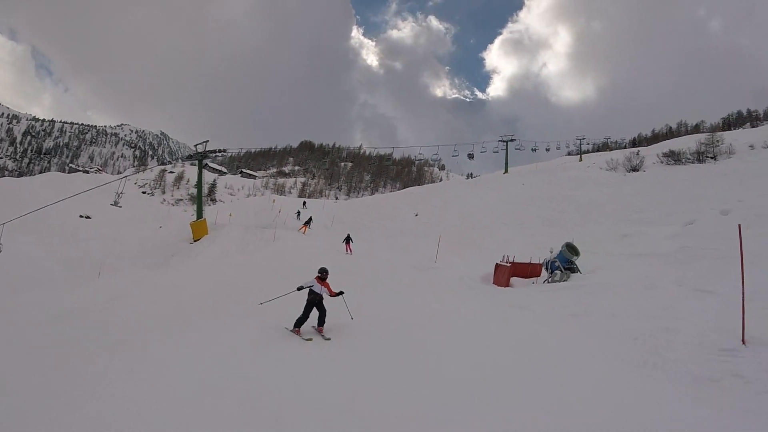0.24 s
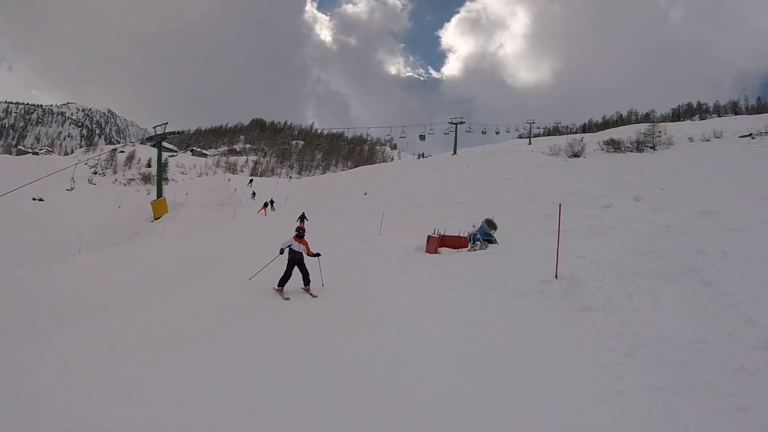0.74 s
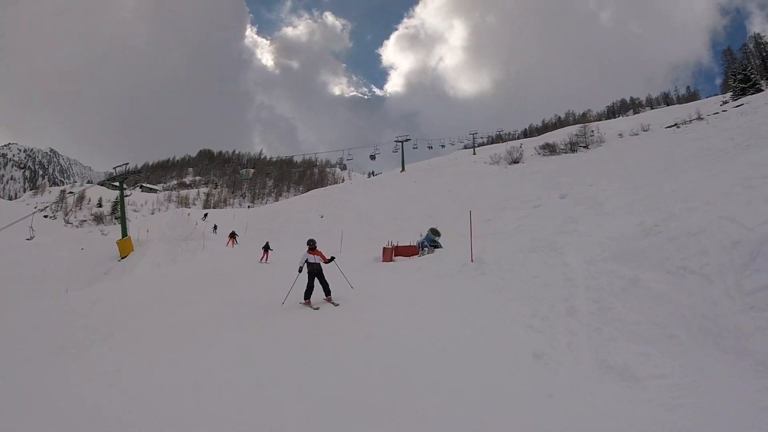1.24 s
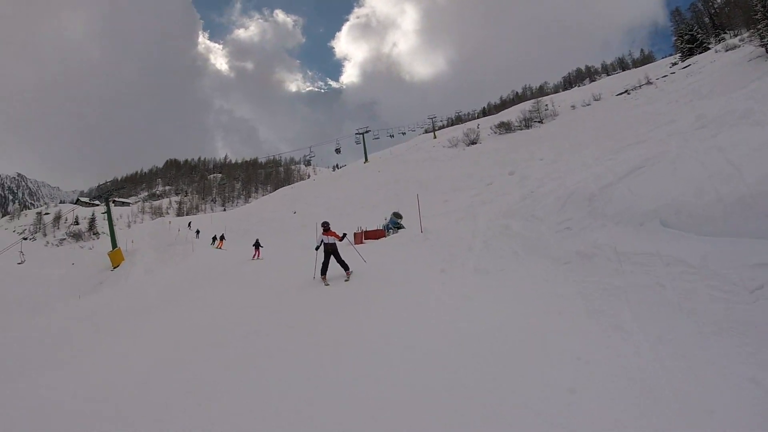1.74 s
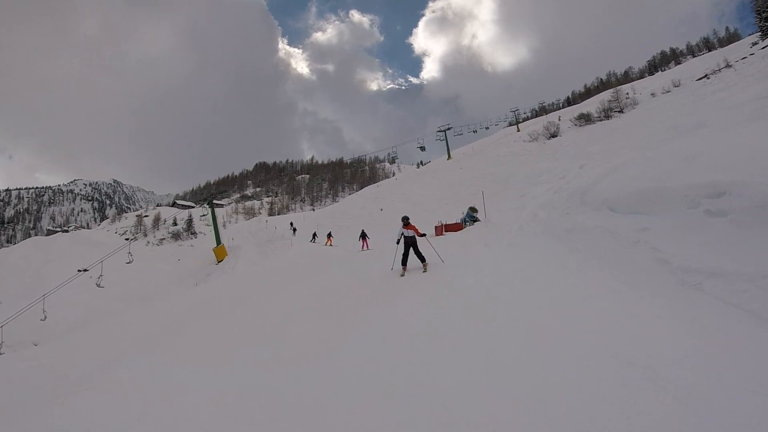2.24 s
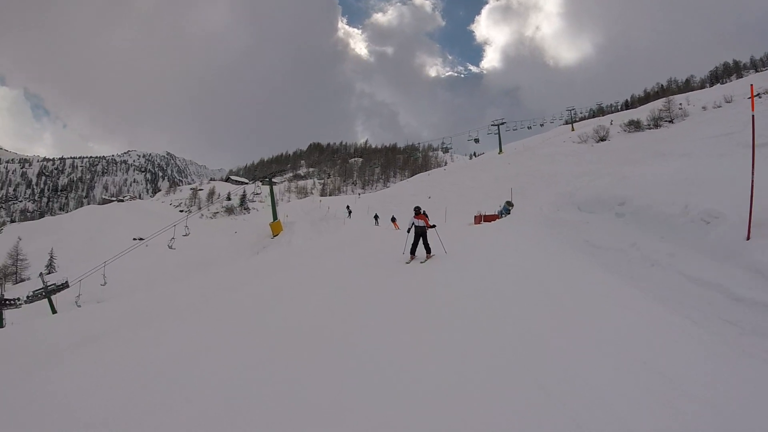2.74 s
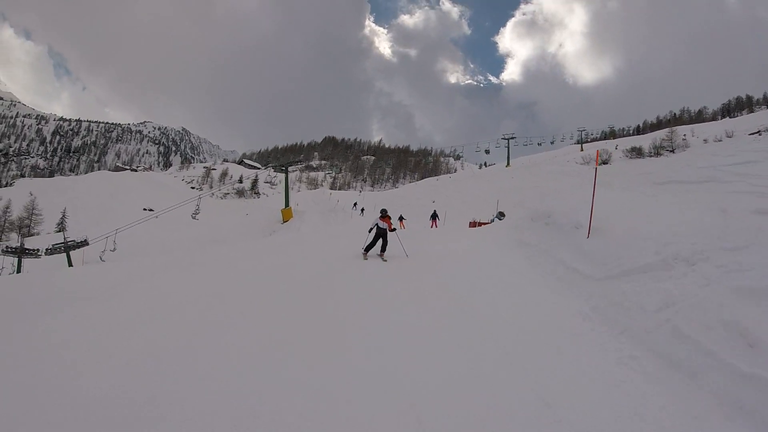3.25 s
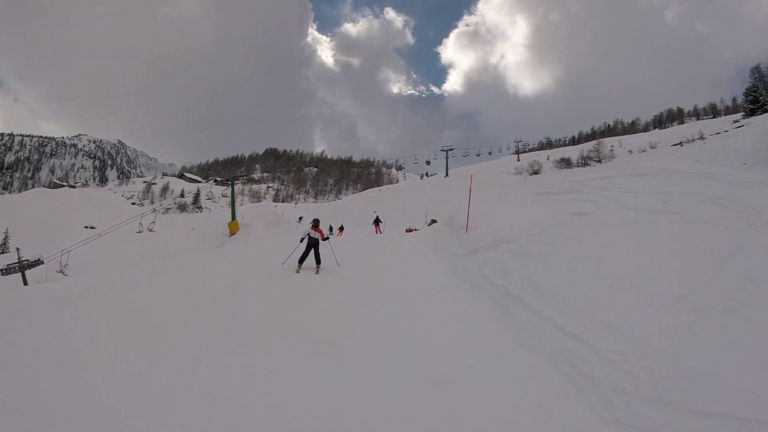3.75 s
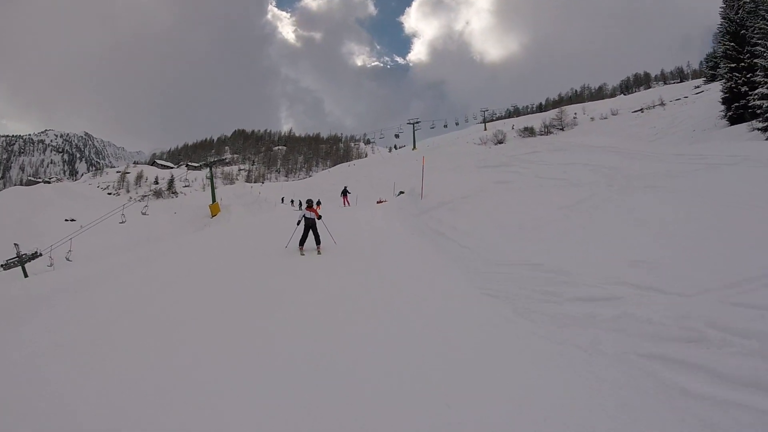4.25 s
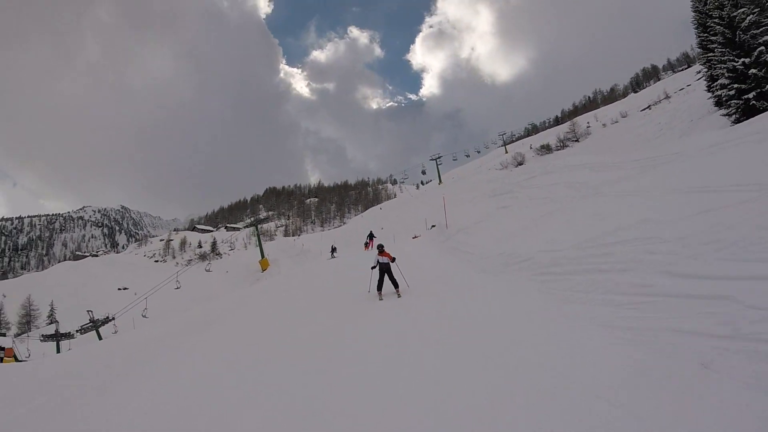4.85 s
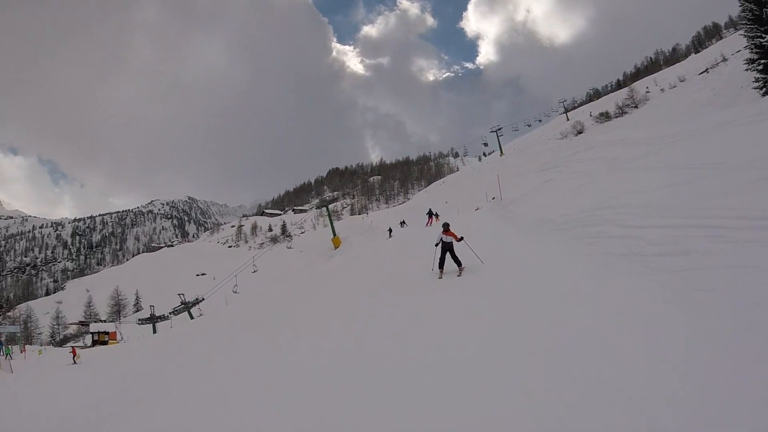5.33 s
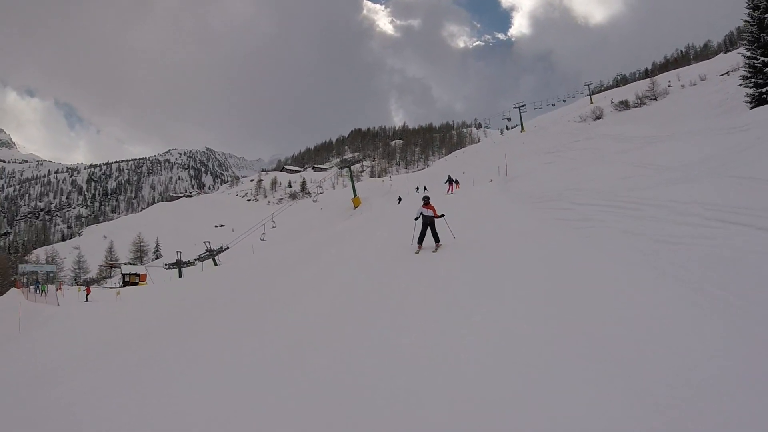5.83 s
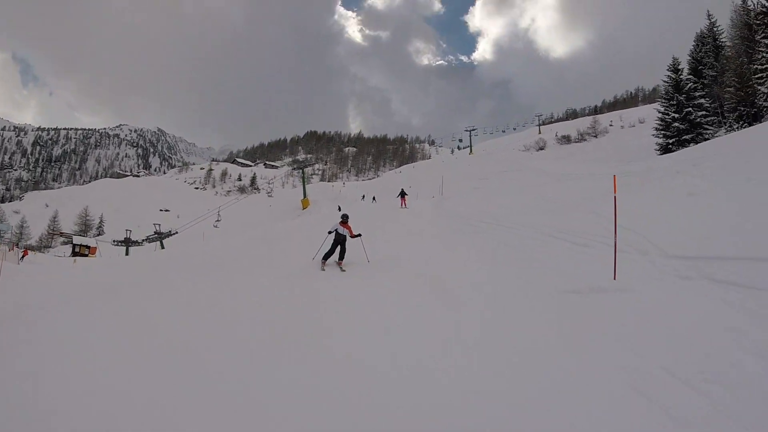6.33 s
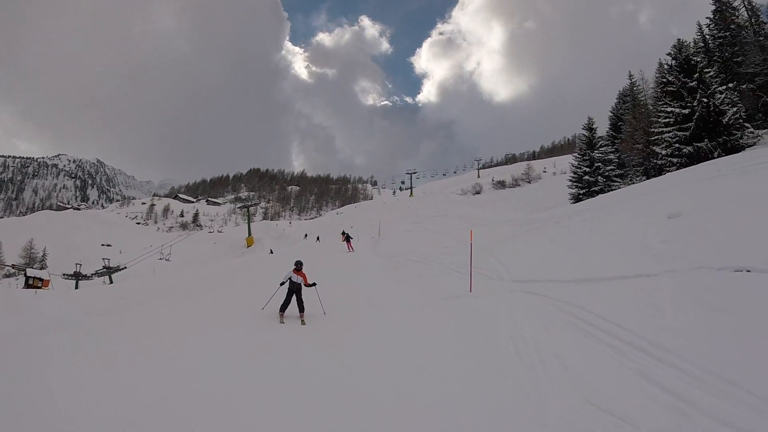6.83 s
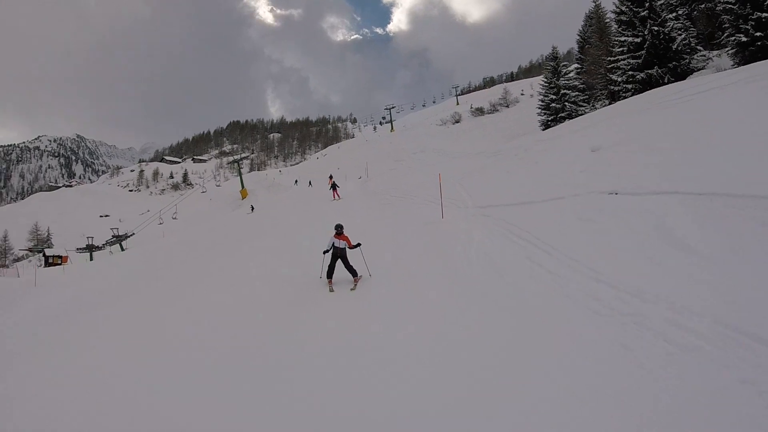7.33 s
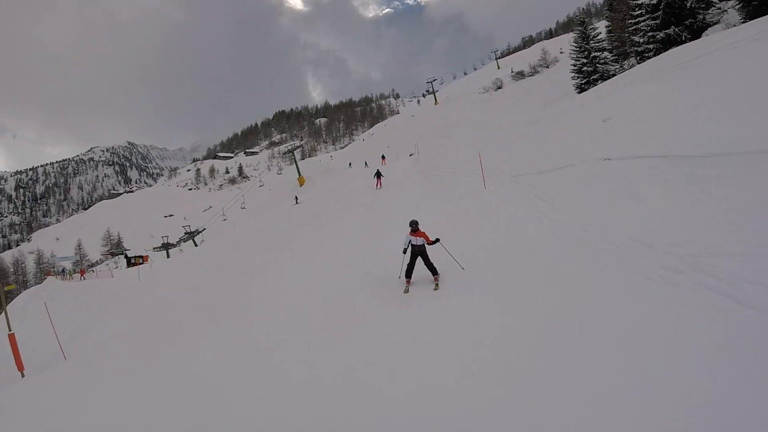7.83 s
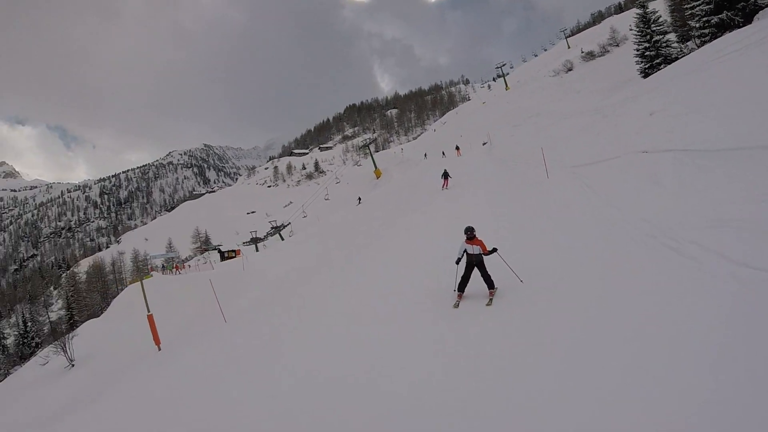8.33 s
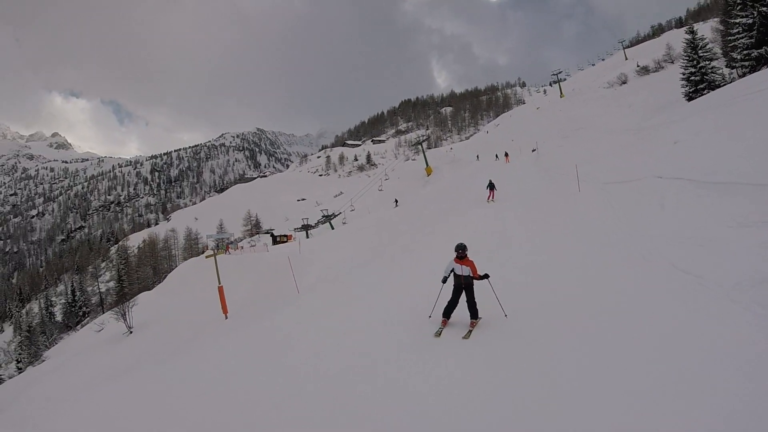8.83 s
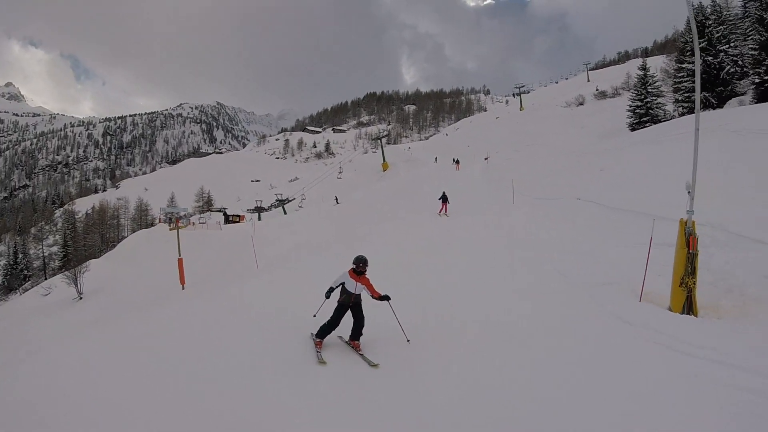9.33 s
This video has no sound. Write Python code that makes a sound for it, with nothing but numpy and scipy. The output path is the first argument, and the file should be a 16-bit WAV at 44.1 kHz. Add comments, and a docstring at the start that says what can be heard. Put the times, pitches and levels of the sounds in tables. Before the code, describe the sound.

Low wind thumps and flutters over a small microphone while ski edges scrape and crunch through turns, ending with skis clacking together.

```python
"""Wind thumps and flutters over a small camera that a skier carries down a groomed slope in linked turns.
Large eddies push on the microphone, smaller ones flutter in clumps, and some gusts roar or bring a hard puff.
In the turns the edges scrape, chatter and groan, as noise shaped by the snow and the ringing of the skis.
Loose snow hisses, hard lumps tick, and the skis clack together near the end."""
import sys
import numpy as np
from scipy import signal
from scipy.fft import rfft, irfft, next_fast_len
from scipy.io import wavfile
from scipy.ndimage import uniform_filter1d, minimum_filter1d, map_coordinates

SR = 44100
rng = np.random.default_rng(int(sys.argv[2]) if len(sys.argv) > 2 else 0)


def int16_out(signal):
    """Quantize to a 16-bit WAV file."""
    q = np.round(np.clip(np.atleast_2d(signal).T, -1, 1) * 32767)
    wavfile.write(sys.argv[1], SR, q.astype(np.int16))


N = 422478
TIME = np.arange(N) / SR

# colours of large, medium and small eddies: (frequency [Hz], level per Hz [dB])
LARGE_EDDIES = [(8, -6), (22, 0), (45, 2), (75, -2.5), (105, -4.5), (140, -16), (200, -29), (330, -51.5),
                (3000, -120)]
MEDIUM_EDDIES = [(50, -19), (85, -9), (120, 1), (165, -3.5), (210, -7), (260, -16.5), (350, -31),
                 (600, -49), (3000, -110)]
SMALL_EDDIES = [(120, -25.5), (200, -2.5), (255, 1), (340, -4.5), (450, -11), (700, -19.5), (1200, -30),
                (3000, -57), (12000, -96)]
# gusts and lulls: (middle time [s], half length [s], change of large eddies [dB], change of small eddies [dB])
GUSTS = [(0.182, 0.022, -6, -4), (0.33, 0.03, -4, -2), (0.422, 0.031, 7, 0), (0.515, 0.032, -4, -1),
         (1.055, 0.086, -1.5, -1), (1.196, 0.068, 4.5, 6), (1.65, 0.069, 2.5, -1), (1.926, 0.089, 1, 4),
         (2.251, 0.039, -10, -5), (2.333, 0.04, 5.5, 4), (2.848, 0.13, -1, 5), (3.13, 0.056, -2.5, -1),
         (3.689, 0.03, -5, -1), (4.36, 0.12, -1.5, 2), (5.098, 0.33, 2, -1), (5.496, 0.059, 1.5, 4),
         (5.973, 0.08, 0.5, 3), (6.158, 0.066, 2, 3), (6.299, 0.053, 0.5, -3.5), (6.808, 0.14, 1.5, -1.5),
         (7.7, 0.2, 2, 1.5), (8.473, 0.11, -3, 0), (8.741, 0.1, -5.5, 1), (8.935, 0.097, 8, 1.5),
         (9.452, 0.036, -3, -1.5)]
# growth with the airflow: (level when cruising [dB], dB per dB of airflow, airflow where it levels off [dB])
LARGE_LAW, MEDIUM_LAW, SMALL_LAW = (-7, 0.89, -8.5), (-14, 1.486, -4.5), (-29, 0.97, 11.9)
# how the eddies' pitch follows the airflow and the gusts [dB per dB]
SPEED_DB_PER_DB, GUST_PITCH_DB_PER_DB = 0.14, -0.0145


def wind():
    """Large eddies push on the microphone; smaller ones gather in clumps where that push is strong."""
    air_db = airflow()
    large_db = eddy_level(air_db, LARGE_LAW)
    medium_db = eddy_level(air_db, MEDIUM_LAW)
    calm_small_db = eddy_level(air_db, SMALL_LAW)
    gust_db = np.zeros(N)  # change of the small eddies
    for s, half_s, large_change_db, small_change_db in GUSTS:
        gust = swell(s, half_s, half_s)
        large_db = large_db + large_change_db * gust
        medium_db = medium_db + 0.36 * (large_change_db + small_change_db) * gust
        gust_db = gust_db + small_change_db * gust
    small_db = calm_small_db + gust_db
    speed = undb(SPEED_DB_PER_DB * air_db + GUST_PITCH_DB_PER_DB * gust_db + .4 * walk(rate=12))

    large = steady(eddies(LARGE_EDDIES, speed), (15, 130), span_s=.08)
    # the smaller eddies come in shared clumps
    clump_db = 1.23 * np.abs(large) + 1.0 * walk(rate=28)
    medium = steady(eddies(MEDIUM_EDDIES, speed) * undb(.7 * clump_db), (110, 220), span_s=.11)
    small = steady(eddies(SMALL_EDDIES, speed) * undb(1.4 * clump_db), (240, 450), span_s=.1)

    lurch_db = 1.52 * walk(rate=22)  # uneven strength shared by all sizes
    thumps = large * undb(large_db + 1.36 * lurch_db)
    rumble = medium * undb(medium_db + lurch_db)
    flutter = small * undb(small_db + 1.2 * lurch_db)
    return thumps + rumble + flutter


# airflow at the microphone, following the skier's speed: (time [s], level compared with cruising [dB])
AIRFLOW = [(0, -9), (0.13, -7), (0.31, -17.5), (0.76, -5.5), (1.05, -7.5), (1.62, -6), (2.0, -1.5),
           (2.7, -1.5), (3.12, -6), (3.55, -6.5), (3.85, 0), (4.4, 2), (4.9, -1.5), (5.55, 1), (6.15, 0),
           (6.45, -2.5), (7.2, -2.5), (7.5, -4.5), (8.2, -6.5), (8.72, -14.5), (9.2, -21), (9.58, -18)]


def airflow():
    """Strength of the airflow in dB, one value a sample."""
    return np.interp(TIME, *np.transpose(AIRFLOW))


def eddy_level(air_db, law):
    """Level in dB that grows with the airflow and then levels off."""
    db, slope, limit_db = law
    knee_db = 1.7  # softness of the levelling off
    excess_db = knee_db * np.logaddexp(0, (air_db - limit_db) / knee_db)
    return db + slope * (air_db - excess_db)


def eddies(spectrum, speed):
    """Roughness of air or snow carried past at a relative speed: going faster moves its whole spectrum up."""
    field = colour(rng.standard_normal(2 * N), spectrum)
    position = np.cumsum(speed) + SR // 10
    return map_coordinates(field, [position], order=3, mode="mirror")


# hollow roar of air around the camera: (frequency [Hz], level per Hz [dB])
ROAR_COLOUR = [(150, -32.5), (280, -9), (335, 6), (400, -3.5), (470, -7), (700, -27), (2000, -55),
               (6000, -91)]
# gusts that roar: (middle time [s], half length [s], level [dB], relative pitch)
ROARING_GUSTS = [(4.4, .13, -36, 1.03), (6.04, .17, -31, .88), (6.18, .055, -25.5, .96)]


def howl():
    """Some gusts make a hollow roar around the camera."""
    return surges(ROARING_GUSTS, ROAR_COLOUR, (280, 480), bend_db=0.5, wander_db=0.1)


# thud of a puff: (frequency at relative pitch 1 [Hz], level per Hz [dB])
THUD = [(120, -8), (340, 5), (500, 0), (700, -9), (1000, -18), (2000, -32), (10000, -79)]
# single hard puffs of air: (start time [s], relative level [dB], relative pitch)
PUFFS = [(1.687, -21.5, 1.05), (2.733, -19.5, 1.15), (2.846, -17.5, 1), (2.97, -19, 1.1), (6.201, -12, 1.1)]


def puffs():
    """A tight eddy hits the microphone and dies at once; each has its own pitch."""
    out = 0
    for s, db, pitch in PUFFS:
        thud = np.array(THUD) * [pitch, 1]
        out = out + colour(undb(db) * burst(s, t60=.06), thud)
    return undb(-3) * out


# colours of edge scrape, hard bite and snow spray: (frequency [Hz], level per Hz [dB])
SCRAPE = [(120, -13.5), (270, -4), (370, 6.5), (500, 1.5), (620, 2), (740, 1.5), (860, 2), (1250, -4),
          (1600, -5.5), (1950, -8.5), (2350, -16), (3100, -24.5), (4200, -28), (15000, -69.5)]
BITE = [(1200, -11.5), (2100, 6), (2500, 4), (3000, 3), (3500, -0.5), (4200, -7.5), (4800, -7), (5400, -6),
        (7000, -17.5), (9500, -28.5), (15000, -45.5)]
SPRAY = [(2500, -18.5), (4000, -9.5), (4800, -9.5), (5300, 1), (6200, -1), (7300, -3.5), (8400, -11),
         (9600, -22.5), (11000, -30.5), (13000, -28), (15000, -33.5)]


def skis(scrape_db, bite_db, spray_db):
    """Edges crush the crust in quick uneven slips, bite into hard snow and throw up a spray of crystals."""
    chatter_db = 0.5 * walk(rate=40) + 0.97 * walk(rate=210)
    crush = grains(rate=1400, spread_db=3.5) + 1.0 * rng.standard_normal(N)
    chips = grains(rate=900, spread_db=-0.5) + 1.12 * rng.standard_normal(N)
    crystals = grains(rate=2300, spread_db=3.0) + 1.0 * rng.standard_normal(N)

    scrape = colour(crush * undb(chatter_db), SCRAPE)
    scrape = steady(scrape + undb(-4) * ski_ring(scrape), (800, 2200), span_s=.15)
    bite = steady(colour(chips * undb(1.3 * chatter_db), BITE), (2600, 4600), span_s=.15)
    spray = steady(colour(crystals * undb(0.64 * chatter_db), SPRAY), (5200, 8000), span_s=.15)

    smooth_share = np.sqrt(1 - coarseness())  # grit() makes the rest of the scrape
    return scrape * undb(scrape_db) * smooth_share + bite * undb(bite_db - 0.9) + spray * undb(spray_db - 2.0)


# turns, in which the edges load and unload:
# (apex time [s], build-up [s], easing [s], relative scrape level [dB], spray compared with scrape [dB])
TURNS = [(0.1, .1, 0.29, -49.5, -7), (0.74, 0.24, 0.25, -39, -14.5), (2.07, 0.48, 0.25, -33.5, -16),
         (2.8, 0.86, 0.65, -41.5, -15), (3.8, 0.18, 0.32, -46.5, -11.5), (5.12, 0.49, 0.42, -33.5, -20.5),
         (6.64, 0.16, 0.28, -38.5, -14.5), (8.05, 0.54, 0.59, -37, -18), (8.55, 0.22, 0.24, -38, -17),
         (9.399, 0.24, 0.55, -48.5, -8.5)]
# skids, in which an edge breaks loose: (start time [s], length [s], relative scrape level [dB],
# bite compared with scrape [dB], spray compared with scrape [dB]), before the mix in skis()
SKIDS = [(0.0, 0.087, -38.5, -15, -15), (0.084, 0.072, -33.5, -13.5, -17), (0.558, 0.068, -46, -5, -23),
         (0.64, 0.081, -36, -10.5, -27), (1.094, 0.24, -48.5, -8, -15), (2.106, 0.077, -34.5, -17, -18),
         (2.32, 0.18, -41, -12, -10), (2.755, 0.11, -39.5, -10, -19), (3.696, 0.077, -41, -12.5, -16),
         (4.775, 0.077, -39.5, -8.5, -12), (5.025, 0.061, -34, -18, -21), (5.197, 0.11, -36.5, -18, -25),
         (5.465, 0.16, -39.5, -11.5, -20), (5.67, 0.28, -42.5, -16.5, -17.5),
         (6.529, 0.18, -37.5, -10.5, -19), (7.539, 0.071, -40.5, -16, -23), (7.868, 0.053, -37.5, -24, -17),
         (8.114, 0.087, -37.5, -9, -18)]


def edge_work():
    """Levels in dB of scrape, bite and spray: gliding, turns and skids add their power."""
    def share(shape, db, bite_db, spray_db):
        """Power of the three sounds as one movement of the skis comes and goes."""
        return np.outer(undb([db, db + bite_db, db + spray_db]) ** 2, shape ** 2)

    # flat skis running straight; their scrape follows the airflow
    power = share(np.ones(N), db=-45, bite_db=-13, spray_db=-17.5)
    power[0] *= undb(0.2 * airflow()) ** 2
    for apex, rise, fall, db, spray_db in TURNS:
        power = power + share(swell(apex, rise, fall), db, -16.5, spray_db)
    attack_s, release_s = .03, .028
    for start, length, db, bite_db, spray_db in SKIDS:
        onset = np.clip((TIME - start) / attack_s, 0, 1)
        fade = np.exp(-np.clip((TIME - start - length) / release_s, 0, 20))
        power = power + share(onset * fade, db, bite_db, spray_db)
    scrape_db, bite_db, spray_db = 10 * np.log10(power)
    patch_db = 0.59 * walk(rate=24)  # hard and soft patches of snow
    return scrape_db + patch_db, bite_db + .8 * patch_db + 1.1 * walk(rate=30), spray_db + 0.61 * patch_db


# ski modes, the notes a ski rings at: (frequency [Hz], relative level [dB], free ringing time to -60 dB [s])
SKI_MODES = [(574, -6, 0.034), (723, -1.5, 0.046), (1027, -11, 0.068), (1268, 2.5, 0.012),
             (1552, 1.5, 0.033), (1870, -1.5, 0.013), (2070, -10.5, 0.0031), (3050, -9.5, 0.034),
             (5227, -12, .05)]


def ski_ring(drive):
    """The ski's modes, each swelling and fading as the contact point slides along the edge."""
    out = 0
    for hz, db, t60 in SKI_MODES:
        width_hz = 2 * np.log(1000) / (np.pi * t60)  # snow contact doubles the damping
        mode = signal.lfilter(*signal.iirpeak(hz, hz / width_hz, fs=SR), drive)
        out = out + mode * undb(db + 3.9 * walk(rate=13))
    return out


# stretches of coarse, refrozen snow: (middle time [s], half length [s], level compared with scrape [dB])
COARSE = [(0.68, .12, -5), (2.05, .3, -7), (5.2, .28, -3.5), (7.8, .2, -4), (8.48, .3, -2.5)]


def coarseness():
    """Share of the scrape's power that comes as separate grains of ice."""
    total = sum(undb(db) ** 2 * swell(s, half_s, half_s) for s, half_s, db in COARSE)
    return np.clip(total, 0, .9)


# sharp snap of cracking snow: (frequency [Hz], level per Hz [dB])
SNAP = [(1200, -7), (2200, 4.5), (3300, -3), (4300, -10), (5600, -3), (7500, -16), (10000, -33.5),
        (15000, -47.5)]


def grit(scrape_db):
    """On coarse snow the edge catches and slips unevenly; each slip cracks a grain and rings the ski."""
    slips_per_s, scatter_db = 95, 6.4  # slip sizes scatter up and down by this much
    count = int(2 * slips_per_s * N / SR)
    gap, size = rng.random((count, 2)).T
    starts = (np.cumsum(.25 + 1.5 * gap) * SR / slips_per_s).astype(int)
    inside = starts < N
    slips = np.zeros(N)
    slips[starts[inside]] = undb(scatter_db * (2 * size - 1))[inside]
    cracks = unit(ring_down(slips, t60=.016) * rng.standard_normal(N))
    crunch = colour(cracks, SCRAPE)
    body = steady(crunch + undb(-8) * ski_ring(crunch), (800, 2200), span_s=.15)
    snap = undb(-14.5) * colour(cracks, SNAP)
    return (body + snap) * undb(scrape_db) * np.sqrt(coarseness())


# groan of a hard-pressed ski: (frequency at relative pitch 1 [Hz], level per Hz [dB])
GROAN = [(200, -26), (380, -7), (480, -6.5), (620, 4), (740, 3), (900, -8.5), (1400, -26.5), (5000, -72.5)]
# deep carves, in which the ski groans: (middle time [s], half length [s], relative level [dB], relative pitch)
CARVES = [(4.86, .08, -38, .9), (5.25, .16, -36, .95), (5.52, .13, -37, 1.1), (7.92, .05, -32.5, .85),
          (8.06, .06, -35, .6), (8.17, .05, -36, .9), (8.35, .1, -39, .62)]


def groan():
    """A hard-pressed ski judders through packed snow with a low, shifting groan."""
    tone = surges(CARVES, GROAN, (300, 900), bend_db=0.24, wander_db=0.5)
    return tone * undb(2.0 * walk(rate=52) - 3)


# crunch of a lump: (frequency [Hz], level per Hz [dB])
CRUNCH = [(150, -21), (400, -4), (750, 5), (1300, -1), (1900, -7.5), (2500, -14.5), (4200, -27.5),
          (15000, -71.5)]
# the hardest lumps of snow hitting the skis: (start time [s], relative level [dB],
# relative treble share [dB], ring frequency [Hz], dying time to -60 dB [s])
LUMPS = [(0.3215, -25.5, -27, 1500, .035), (0.348, -28, -28, 1200, .04), (0.586, -22, -24, 1400, .04),
         (0.631, -21, -24, 800, .035), (0.686, -18, -26, 1300, .045), (0.93, -24, -25, 1200, .035),
         (1.5268, -20.5, -29, 1000, .04), (1.911, -18, -30, 1030, .05), (1.957, -12, -31, 1230, .045),
         (2.198, -19, -30, 710, .09), (2.257, -22, -22, 1300, .035), (2.353, -21.5, -20, 730, .05),
         (2.395, -23, -20, 1800, .05), (2.4505, -25, -16.5, 1500, .035), (3.008, -24, -22, 1200, .04),
         (3.4445, -24.5, -17, 2200, .028), (4.879, -24, -19, 1500, .04), (5.009, -17.5, -32, 670, .035),
         (5.0384, -19.5, -17, 1400, .055), (5.082, -23, -21, 1500, .05), (5.202, -18, -32, 730, .045),
         (5.2694, -19.5, -22, 530, .06), (5.298, -22, -21, 900, .03), (5.3248, -21, -27, 830, .04),
         (5.334, -23, -15, 2000, .035), (5.366, -19, -19, 650, .045), (5.889, -23, -29, 1000, .04),
         (5.959, -23.5, -28, 1550, .055), (6.0245, -19.5, -29, 1300, .05), (6.517, -21.5, -26, 1100, .04),
         (6.543, -21, -25, 1300, .05), (7.583, -24, -27, 900, .045), (7.633, -22, -32, 800, .04),
         (7.741, -25, -20, 600, .06), (7.779, -20, -22, 1250, .06), (7.805, -28, -17, 1600, .03),
         (7.899, -22, -26, 450, .05), (7.93, -21, -24, 800, .05), (8.0225, -18, -26, 705, .04),
         (8.1154, -22, -32, 560, .04), (8.459, -24, -18, 1400, .045), (8.551, -22, -27, 1400, .04),
         (8.667, -27, -19, 1900, .035), (8.749, -23, -32, 800, .04), (9.281, -29, -30, 1200, .04)]


def lumps(scrape_db):
    """Lumps crunch, snap and briefly ring the ski; random crumbs are louder on a loaded edge."""
    body, edge, ring = 0, 0, 0
    for s, db, treble_db, hz, t60 in LUMPS:
        crunch = undb(db) * burst(s, t60)
        body = body + crunch
        edge = edge + undb(db + treble_db) * burst(s, t60)
        ring = ring + ski_band(crunch, hz)
    # crumbs, 16 a second, start 7 to 13 dB above the scrape level before the mix below
    falls = rng.random(N) < 16 / SR
    hits = falls * undb(scrape_db + 7 + 6 * rng.random(N))
    crumbs = ring_down(hits, t60=.022) * rng.standard_normal(N)
    dull = undb(-8.5) * (colour(body + crumbs, CRUNCH) + undb(-3) * ring)
    sharp = undb(5.5) * colour(edge + undb(-21.5) * crumbs, SNAP)
    return dull + sharp


def ski_band(x, hz):
    """A steep resonance of the ski at hz; white noise keeps its power."""
    q = 3  # sharpness
    b, a = signal.iirpeak(hz, q, fs=SR)
    return signal.lfilter(b, a, signal.lfilter(b, a, x)) * np.sqrt(2 * SR * q / (np.pi * hz))


# dry crack and hollow body of a knock: (frequency [Hz], level per Hz [dB])
CRACK = [(150, -9), (400, 3), (750, 10), (1200, 7), (1600, 0), (2200, -4), (3300, -13), (4300, -18),
         (5400, -12), (7500, -24), (12000, -56)]
THUMP = [(150, -10), (330, 0), (520, 0), (780, -3), (1000, -14), (2500, -35), (9000, -70)]
# skis knocking together: (start time [s], relative level [dB], most strongly struck frequency [Hz],
# relative thump share [dB], crack share [dB], snap share [dB])
KNOCKS = [(8.8465, -27, 1000, -5, -7, -25), (8.933, -31, 1700, -5, -6, -15),
          (8.9385, -22.5, 1600, 0.5, -10, -26), (8.9805, -32, 900, -9, -3, -15),
          (8.986, -34, 1100, -12, -1, -13), (9.0145, -19.5, 1050, -15, -13, -27),
          (9.062, -38, 2400, -20, -2, -9)]


def knocks():
    """The skis knock together: a crack, a snap, a hollow thump and modes picked by the point of contact."""
    cracks, snaps, thumps, rings = 0, 0, np.zeros(N), np.zeros(N + SR)
    age = np.arange(SR // 5) / SR
    for s, db, struck_hz, thump_db, crack_db, snap_db in KNOCKS:
        cracks = cracks + undb(db + crack_db) * burst(s, t60=.028)
        snaps = snaps + undb(db + snap_db) * burst(s, t60=.05)
        start = int(s * SR)
        thumps[start] = undb(db + thump_db)
        for k, (hz, mode_db, t60) in enumerate(SKI_MODES):
            # modes far from the struck pitch ring less: 22 dB an octave
            distance_db = 22 * abs(np.log2(hz / struck_hz))
            size = (-1) ** k * undb(db + mode_db - distance_db)
            rings[start:start + len(age)] += size * np.sin(2 * np.pi * hz * age) * decay(age, t60)
    thump = undb(17) * colour(thumps, THUMP)
    return colour(cracks, CRACK) + colour(snaps, SNAP) + thump + rings[:N]


def fine_hiss():
    """A faint steady hiss at the very top, made of coloured noise."""
    spectrum = [(4000, -9.0), (9000, -0.5), (12300, -7.0), (15000, -14.0)]  # (Hz, dB per Hz)
    return undb(-67.0) * colour(rng.standard_normal(N), spectrum)


def surges(table, spectrum, band, bend_db, wander_db):
    """Coloured noise that swells with each table row, rises in pitch with the load and wanders."""
    swells = np.array([undb(db) * swell(s, half_s, half_s) for s, half_s, db, _ in table]) + 1e-12
    gain = swells.sum(axis=0)
    pitch = np.array(table)[:, 3] @ swells / gain  # average weighted by loudness
    speed = pitch * undb(bend_db * (gain / gain.max() - 1.0) + wander_db * walk(rate=25))
    return gain * steady(eddies(spectrum, speed), band, span_s=.04)


def swell(apex, rise, fall):
    """A smooth hump of height 1."""
    return np.exp(-((TIME - apex) / np.where(TIME < apex, rise, fall)) ** 2)


def decay(age, t60):
    """Dying away by 60 dB in t60 seconds."""
    return np.exp(-np.log(1000) * age / t60)


def ring_down(hits, t60):
    """Let every hit die away by 60 dB in t60 seconds."""
    return signal.lfilter([1], [1, -decay(1 / SR, t60)], hits + 1e-18)


def burst(s, t60):
    """A crunch of noise that starts at s and dies away."""
    age = np.arange(SR // 5) / SR
    out, start = np.zeros(N + len(age)), int(s * SR)
    out[start:start + len(age)] = rng.standard_normal(len(age)) * decay(age, t60)
    return out[:N]


def grains(rate, spread_db):
    """Tiny fractures at random moments, rate a second, of unequal size."""
    chance, size, push = rng.random(N), rng.standard_normal(N), rng.standard_normal(N)
    return unit((chance < rate / SR) * np.sign(push) * undb(spread_db * np.clip(size, -2, 2)))


def walk(rate):
    """Random levels held 1 / rate s and smoothed into slopes; spread 1."""
    k = max(int(SR / rate), 2)
    steps = np.repeat(rng.standard_normal(N // k + 1), k)
    return unit(uniform_filter1d(steps, k)[:N])


def steady(x, band, span_s):
    """Hold one band (Hz, Hz) near rms 1: slow swells even out, quick ones stay."""
    k = max(int(span_s * SR), 2)
    power = signal.sosfilt(signal.butter(2, band, "band", fs=SR, output="sos"), x) ** 2
    return x / np.sqrt(uniform_filter1d(uniform_filter1d(power, k), k))


def colour(x, points):
    """Causal filter with a spectrum of (Hz, dB) points; white noise keeps its power."""
    size = next_fast_len(len(x) + 4096)
    hz, db = np.transpose(points)
    gain = unit(undb(np.interp(np.log(np.fft.rfftfreq(size, 1 / SR) + 1), np.log(hz), db)))
    # folding the cepstrum makes the filter respond only after its input
    cepstrum = irfft(np.log(gain), size)
    cepstrum[1:size // 2] *= 2
    cepstrum[size // 2 + 1:] = 0
    return irfft(rfft(x, size) * np.exp(rfft(cepstrum)), size)[:len(x)]


def undb(db):
    """Decibels to gain."""
    return 10 ** (np.asarray(db) / 20)


def unit(x):
    """Scale to rms 1."""
    return x / np.sqrt(np.mean(x ** 2))


def scene():
    """Wind and skis at one microphone in the open air."""
    scrape_db, bite_db, spray_db = edge_work()
    snow = skis(scrape_db, bite_db, spray_db) + grit(scrape_db) + groan() + lumps(scrape_db)
    air = wind() + howl() + puffs()
    return (air + snow + knocks() + fine_hiss())[None]


def record(dry):
    """A limiter holds down the strongest peaks; a steep filter cuts the top."""
    ceiling, hold = undb(-3.1), int(.016 * SR)
    needed_gain = ceiling / np.maximum(np.abs(dry), ceiling)
    gain = uniform_filter1d(minimum_filter1d(needed_gain, hold), hold)
    top_cut = signal.ellip(8, .2, 70, 15300, fs=SR, output="sos")  # cutoff in Hz
    return signal.sosfilt(top_cut, dry * gain)


dry = scene()
out = record(dry)
int16_out(out)
```